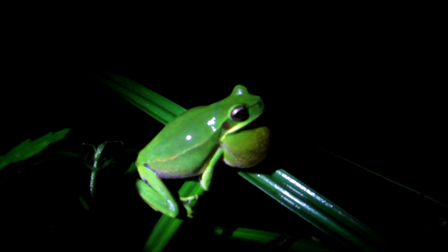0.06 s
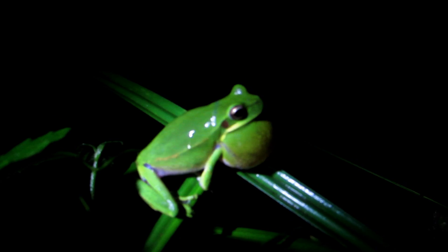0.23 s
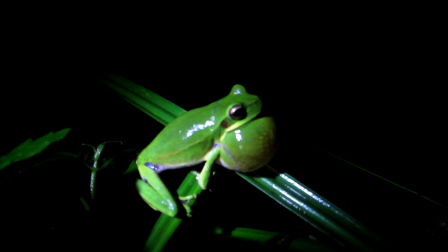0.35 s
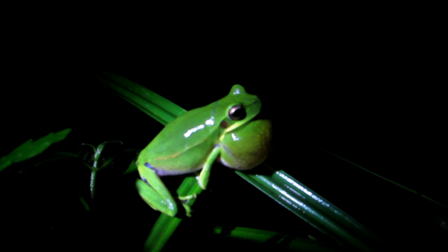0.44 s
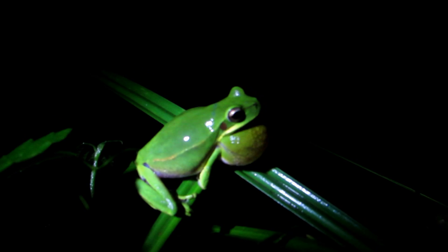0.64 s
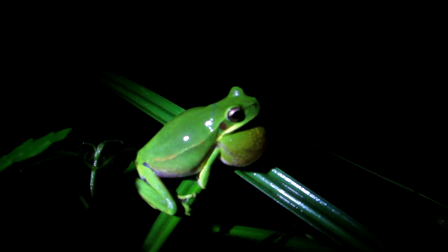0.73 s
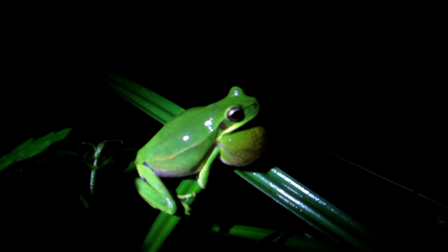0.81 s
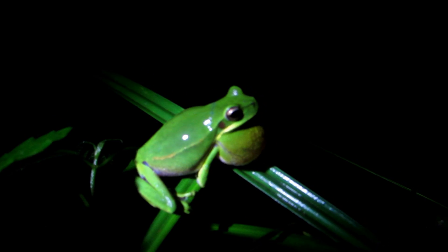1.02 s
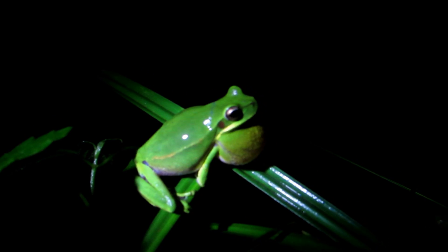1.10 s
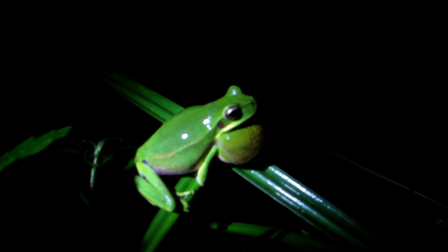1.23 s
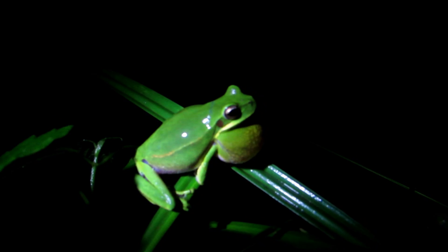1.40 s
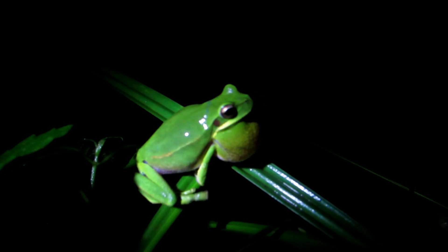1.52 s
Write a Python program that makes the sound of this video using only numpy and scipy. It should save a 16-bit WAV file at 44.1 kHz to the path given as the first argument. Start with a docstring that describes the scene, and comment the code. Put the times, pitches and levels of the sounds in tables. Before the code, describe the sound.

Close tree frog croaks, four short pulses then a buzzing longer croak, rougher frogs answering farther off

```python
"""Night by a pond. From the start a stereo hiss (shaped noise), crickets (wavering tones and narrow noise bands)
and distant frogs. Soon a tree frog close to the microphone gives four short croaks and a long one, each a train
of throat pulses ringing its vocal sac; a drawn gain curve sinks hiss and crickets meanwhile, then recovers.
More frogs answer farther off, wetter and rougher, each from its side; about a second in, one purrs slowly,
and near the end two ticks (short noise bursts) snap in the leaves."""
import sys
import numpy as np
from scipy import signal
from scipy.fft import rfft, irfft, next_fast_len
from scipy.io import wavfile
from scipy.ndimage import map_coordinates

SR = 44100
rng = np.random.default_rng(int(sys.argv[2]) if len(sys.argv) > 2 else 0)


def output_pcm(signal):
    """Save a mono or channel-first signal as 16-bit PCM at the path in sys.argv[1].

    Samples are clipped to [-1, 1] before scaling.
    """
    pcm = np.clip(np.atleast_2d(signal).T, -1, 1) * 32767
    wavfile.write(sys.argv[1], SR, np.round(pcm).astype(np.int16))


def amplitude_ratio(level_db):
    """Convert a level in decibels to the matching linear amplitude (field) ratio."""
    exponent = np.asarray(level_db, float) / 20
    return 10 ** exponent


N = 68355
T = np.arange(N) / SR  # seconds


def unit(x):
    """x scaled to an rms of 1."""
    return x / np.sqrt(np.mean(x ** 2) + 1e-20)


def along(points, hz):
    """Reads (Hz, value) points on a log frequency axis."""
    f, v = np.transpose(points)
    return np.interp(np.log(hz + 1), np.log(f + 1), v)


def filtered(x, response):
    """x times a response of frequency."""
    m = next_fast_len(N + 8192)
    return irfft(rfft(x, m) * response(np.fft.rfftfreq(m, 1 / SR)), m)[..., :N]


def wobble(rate):
    """A smooth random curve, rate knots a second."""
    return map_coordinates(rng.standard_normal(int(N * rate / SR) + 4), [T * rate])


def hiss():
    """Stereo night noise of rms 1; the angle between its mid and side shares sets how alike the two sides are."""
    # Tone of the night. Each row: frequency in Hz, relative density in dB per Hz.
    hiss_tone = [(15, -46), (25, -22.5), (177, -13.5), (258, -15), (406, -8.5), (503, -9.5), (908, -10),
                 (1360, -3.5), (2080, -7.5), (2380, -9.5), (2650, -11), (3970, -15), (5050, -11),
                 (7760, -19.5), (11300, -19), (15200, -21.5)]
    # Likeness of the two sides. Each row: frequency in Hz, left-right correlation from -1 to 1.
    likeness = [(60, 0.69), (180, -0.012), (540, 0.41), (1630, 0.62), (4890, 0.56), (14700, -0.3)]

    def shares(f):
        angle = np.arccos(np.clip(along(likeness, f), -1, 1)) / 2
        return amplitude_ratio(along(hiss_tone, f)) * [np.cos(angle), np.sin(angle)]

    mid, side = filtered(rng.standard_normal((2, N)), shares)
    return unit(np.array([mid + side, mid - side]))


def crickets():
    """A thin low song of gated, wavering tones, and two chirping narrow noise bands above."""
    # Low song. Each row: start in seconds, length in seconds, mean level in dB before panning, pitch in Hz.
    low_song = [(0.011, 0.14, -50.5, 2336), (0.989, 0.045, -44, 2305), (1.158, 0.108, -50, 2320)]
    # High singers. Each row: centre in Hz, half width in Hz, level in dB ahead of the bouts and chirps,
    # chirps per second, time of one chirp in seconds, chirp depth in dB either way.
    high_singers = [(5270, 14, -60.5, 35.7, 1.4996, 8), (4900, 180, -63.5, 36, 0, 2)]
    # Bouts of the highest singer. Each row: time in seconds, change of level in dB.
    bouts = [(.58, -4), (.66, 1), (.96, 0.5), (1.05, -14), (1.2, 0.5)]
    low = np.zeros(N)
    for s, length, db, hz in low_song:
        strength = amplitude_ratio(db + 2.6 * wobble(60.65))
        tone = np.sin(2 * np.pi * hz * T + .5 * wobble(38.5))
        gate = np.clip(np.minimum(T - s, s + length - T) / 0.0032, 0, 1)  # 3.2 ms ramps
        low += strength * tone * gate
    out = low * amplitude_ratio([[2.5], [-2.5]])  # to the left
    bout_curves = (np.interp(T, *np.transpose(bouts)), 0)
    for bout_db, (hz, width_hz, db, rate, s, depth_db) in zip(bout_curves, high_singers):
        noise = rng.standard_normal((2, N))
        singer, spread = unit(filtered(noise, lambda f: 1 / (1 + ((f - hz) / width_hz) ** 2)))
        singer = unit(singer / np.abs(signal.hilbert(singer)))  # wavering pitch, even strength
        chirp_db = depth_db * np.cos(2 * np.pi * rate * (T - s))
        strength = amplitude_ratio(db + bout_db + chirp_db + wobble(2.45))
        out = out + strength * np.array([singer + 0.19 * spread, singer - 0.49 * spread])
    return out


def ticks():
    """Short bright snaps in the leaves: bell-shaped bursts of flickering, treble-heavy noise."""
    # Leaf ticks. Each row: start in seconds, peak of the burst's envelope in dB ahead of trim_db.
    leaf_ticks = [(1.2403, -28), (1.49, -29)]
    length_s, trim_db = 0.011, -0.5
    half_s = length_s / 2
    shape = sum(amplitude_ratio(db + trim_db) * np.exp(-((T - s - half_s) / half_s) ** 2) for s, db in leaf_ticks)
    flicker = rng.standard_normal((2, N)) * amplitude_ratio(3.4 * wobble(630))
    return shape * filtered(flicker, lambda f: f / (f + 2500) / (1 + (f / 9000) ** 2))


def croak(s, length, db, fade_db, rates, modes, choke_s, jitter, scatter_db):
    """Throat pulses on a rate curve, each snapping and ringing the modes until the next one chokes it."""
    # modes: (Hz, dB, t60 s); jitter: a share of the first pulse period
    rise_s, release_s, release_db = .00045, 0.022, -4
    crack_db, crack_t60_s = -40, 0.012
    luck = rng.standard_normal((64, 2))
    # count the pulses along the rate curve, then find when each falls
    u = np.linspace(0, 1, 200)
    rate_curve = np.interp(u, np.linspace(0, 1, len(rates)), rates)
    beats = np.cumsum(rate_curve) * length / len(u)
    k = np.arange(int(np.round(beats[-1])) + 1)
    at = np.interp(k, beats - beats[0], u * length) + jitter * luck[k, 0] * (k > 0) / rates[0]
    size_db = db + fade_db * np.sqrt(np.abs(at) / length) + scatter_db * luck[k, 1]
    # longer croaks sink further at their end
    release = np.clip(1 - (length - at) / release_s, 0, 1) * (length > 2 * release_s)
    size_db = size_db + release_db * release
    i = int(s * SR)
    span = np.arange(i, min(N, i + int((length + 0.026) * SR)))
    t = np.clip(span / SR - s - at[:, None], 0, None)  # seconds since each pulse, one row a pulse

    def steps(v):
        """The value for each pulse, from values at even steps through the croak."""
        return np.interp(at / length, np.linspace(0, 1, np.size(v)), np.ravel(v))[:, None]

    ring = sum(amplitude_ratio(steps(g) - 60 * t / t60) * np.sin(2 * np.pi * steps(hz) * t) for hz, g, t60 in modes)
    ring = ring + amplitude_ratio(crack_db - 60 * t / crack_t60_s) * rng.standard_normal(N)[span]
    since_next = np.vstack([t[1:], 0 * t[0]])
    choke = np.exp(-(since_next / choke_s) ** 2)
    rise = 1 - np.exp(-(t / rise_s) ** 2)
    out = np.zeros(N)
    out[span] = amplitude_ratio(size_db) @ (ring * choke * rise)
    return out


def echoes(x):
    """The plants around send back a short blurred tail, a different one to each side of the microphone."""
    t60_s = .12
    t = T[:SR // 4]
    tail = rng.standard_normal((2, len(t))) * amplitude_ratio(-60 * t / t60_s) * (t > .003)
    return signal.fftconvolve(x[None], tail / np.linalg.norm(tail[0]), axes=1)[:, :N]


def radiated(x):
    """A steep loss of the lows, down 29 dB below 750 Hz so that a faint thump stays; the sign is turned."""
    return -signal.sosfilt(signal.cheby2(5, 29, 750, "high", fs=SR, output="sos"), x)


def purr(choke_s=0.0028, jitter=.018):
    """Slow, short, even pulses from a far frog, each ringing one mode."""
    # One row: start in seconds, length in seconds, first pulse in dB, ring in Hz,
    # pulses per second at the start and end, t60 in seconds.
    s, length, db, hz, rates, t60 = (.9875, .192, -33, 1400, (67, 61), .014)
    return croak(s, length, db, 0, rates, [(hz, 0, t60)], choke_s, jitter, scatter_db=2.5)


def far_frogs():
    """Rougher, wetter croaks from a distance, each louder and earlier on its own side."""
    # Croaks. Each row: length in seconds, first pulse in dB ahead of panning and filter, fade in dB,
    # pulses per second at mid-croak, sac in Hz, throat in Hz, throat in dB beside the sac, left minus right in dB.
    far_croaks = [(0.062, -36.5, -8, 790, 1883, 1040, -9, 2), (0.026, -26, 2, 150, 1390, 1230, -8, 0.5),
                  (0.099, -29, -17.5, 400, 1790, 1440, -2.5, -20.5),
                  (0.073, -32.5, -4, 370, 1710, 1440, 2, -3), (0.06, -19, -30, 260, 1755, 1110, -4.5, -2.5),
                  (0.032, -21.5, -7, 357, 1710, 1065, -9, -3), (0.078, -26.5, -24.5, 490, 1780, 1080, 0, 1),
                  (0.05, -29, -8, 385, 1926, 1154, -0.5, 3), (0.05, -31.5, 6, 345, 2050, 1520, 1.5, 1),
                  (0.061, -22, -1, 334, 1734, 1163, -5, -3.5), (0.017, -24, -8, 440, 2020, 1520, 2, -4.5),
                  (0.037, -23, -4.5, 410, 2094, 1280, -8, -2.5),
                  (0.065, -19, -2, 330, 1733, 1183, -8, -3.5),
                  (0.0179, -18.5, -4.5, 323, 2310, 1800, -2.5, -4),
                  (0.021, -13.5, -13, 260, 2240, 1550, -5, -0.5),
                  (0.07, -17, -12, 322, 1690, 1274, -6.5, -4.5),
                  (0.041, -16, -11.5, 420, 2297, 1836, -5, -3.5),
                  (0.045, -15, -15.5, 380, 1616, 1420, -5.5, -4.5),
                  (0.015, -28, -9.5, 295, 1230, 1520, 2, 6.5),
                  (0.025, -14.5, -6.5, 335, 1650, 1240, -4, -2.5),
                  (0.0132, -23, -1.5, 290, 1450, 1150, -6.5, 1),
                  (0.015, -21.5, -1.5, 336, 1760, 1300, -11, 0.5),
                  (0.0143, -15, -4, 220, 1680, 1410, -5, -3.5),
                  (0.045, -27, -2.5, 303, 1840, 1206, -2.5, -4),
                  (0.017, -22.5, -3, 296, 1630, 1263, 1, 1.3), (0.03, -27.5, -7, 295, 1175, 1700, -1, -0.5),
                  (0.095, -35.5, -4.5, 210, 1880, 1630, -2.5, -1)]
    # Each row: start of a croak in seconds.
    far_starts = [0, .1945, .283, .36, .455, .5283, .567, .638, .7, .7195, .774, .795, .809, .851, .876,
                  .8995, .937, 1.1975, 1.235, 1.267, 1.307, 1.322, 1.3478, 1.366, 1.3945, 1.41, 1.44]
    # The scratchy top of a pulse. Each row: frequency in Hz, t60 in seconds.
    rasp = [(2750, 0.011), (3450, 0.0072)]
    # Each row: level of one croak's rasp in dB beside the sac.
    rasp_levels = [-24, -13.5, -22, -31, -14, -35, -13, -1.5, -34, -12, -15.5, -34, -17, -17, -30, -12, -12,
                   -18.5, -11, -17.5, -13, -25, -18.5, -26, -8, -10, -23]
    t60_s, choke_s, wet_db, lag_s_per_db = 0.039, 0.0028, -8, 1.3e-5
    arch = np.array([1 - 0.0428, 1, 1 - 0.0428])  # the pulse rate is lower at both ends
    out = np.zeros((2, N))
    for s, rasp_db, row in zip(far_starts, rasp_levels, far_croaks):
        length, db, fade, rate, hz, low_hz, low_db, pan_db = row
        modes = [(hz, 0, t60_s), (low_hz, low_db, t60_s)] + [(f, rasp_db, t60) for f, t60 in rasp]
        x = croak(s, length, db, fade, rate * arch, modes, choke_s, jitter=.018, scatter_db=2.4)
        side = np.array([[.5], [-.5]]) * pan_db
        pair = np.array([np.interp(T + lag, T, x) for lag in side[:, 0] * lag_s_per_db])
        out += amplitude_ratio(side) * pair
    return radiated(out + amplitude_ratio(wet_db) * echoes(out.mean(0)))


def near_frog():
    """Clean, steady pulses ring throat against sac, close by and reaching the right side a little first."""
    # Croaks. Each row: start in seconds, length in seconds, first pulse in dB ahead of the filters, fade in dB,
    # sac t60 in seconds, top ring in Hz, sac in Hz and pulses per second at even steps through the croak.
    near_croaks = [(0.2140, 0.004, 0.52, -1, 0.017, 5960, (1650,), (232, 232)),
                   (0.2501, 0.0094, 2.4, -7, 0.017, 7200, (1650,), (210.4, 204)),
                   (0.2931, 0.0079, 0.57, -1.5, 0.013, 6560, (1624,), (225, 231.7)),
                   (0.338, 0.0140, 0.025, -1.5, 0.015, 7460, (1720, 1654), (259.7, 255, 152.5)),
                   (0.3947, 0.053, 0.078, -10.5, 0.017, 6960, (1710, 1830, 1590),
                   (305.8, 333.3, 350.8, 340.4, 316, 247))]
    # Rings above the sac. Each row: frequency in Hz, level in dB beside the sac, t60 in seconds.
    body = [(2320, -24.5, 0.006), (3100, -22, 0.0068), (4720, -29.5, 0.0056)]
    # The throat's ring. One row: frequency in Hz, level in dB beside the sac, t60 in seconds.
    throat = (1070, -11.5, 0.035)
    # Each row: level of the thin top ring in dB beside the sac, at even steps through the croak.
    top_levels = (-38, -29, -36)
    top_t60_s, sac_choke_s, throat_choke_s = .007, 0.00023, 0.0025  # the throat is stilled more slowly
    jitter, scatter_db = .003, .8
    thump_db, thump_s, lag_s, wet_db = -41, 0.00022, 2.6e-5, -32
    x = np.zeros(N)
    for s, length, db, fade, t60, top_hz, hz, rates in near_croaks:
        sac_modes = [(hz, 0, t60)] + body + [(top_hz, top_levels, top_t60_s)]
        x += croak(s, length, db, fade, rates, [throat], throat_choke_s, jitter, scatter_db)
        x -= croak(s, length, db, fade, rates, sac_modes, sac_choke_s, jitter, scatter_db)
    # the sac radiates no lows, and little just under the throat ring
    x = signal.sosfilt(signal.butter(3, 590, "high", fs=SR, output="sos"), x)
    x = signal.lfilter(*signal.iirnotch(814, 4.33, SR), x)
    # a small push of air as a croak opens, under its first pulse
    for s, _, db, *_ in near_croaks:
        u = np.clip(T - s, 0, None) / thump_s
        x = x - amplitude_ratio(db + thump_db) * u * np.exp(1 - u)
    pair = filtered(x, lambda f: np.exp(1j * np.pi * f * lag_s * np.array([[-1], [1]])))
    return pair + amplitude_ratio(wet_db) * echoes(x)


def scene():
    """Sums frogs and ticks with hiss and crickets, these two under the recorder's gain as a drawn curve."""
    # Recorder's automatic gain, as a drawn curve on hiss and crickets: sinks as the near frog calls,
    # then recovers. Each row: time in seconds, hiss level in dB ahead of hiss_db.
    gain_curve = [(0.0, -54), (0.266, -52), (0.396, -58.5), (0.682, -53.5), (0.948, -50.5), (1.39, -48),
                  (1.55, -47)]
    hiss_db = 7
    gain_db = np.interp(T, *np.transpose(gain_curve))
    cricket_gain = amplitude_ratio(gain_db - gain_db.mean())
    frogs = near_frog() + far_frogs() + purr()
    return frogs + ticks() + cricket_gain * crickets() + amplitude_ratio(gain_db + hiss_db) * hiss()


def top_cut(x):
    """Nothing passes above the cut-off."""
    return signal.sosfilt(signal.butter(12, 15310, fs=SR, output="sos"), x)


def record(dry):
    """The microphone loses the top octave's end and dips at some pitches; peaks clip at full scale."""
    # Microphone dips. Each row: centre in Hz, half width in Hz, depth from 0 to 1.
    mic_dips = [(3990, 196, 0.62), (8500, 49, 0.32)]
    top_hz = 13900

    def microphone(f):
        dips = [1 - np.clip(d, 0, 1) / (1 + ((f - c) / w) ** 2) for c, w, d in mic_dips]
        return 1 / (1 + (f / top_hz) ** 40) * np.prod(dips, axis=0)

    mix = np.clip(filtered(dry, microphone), -1, 1)
    return top_cut(mix)


dry = scene()
out = record(dry)
output_pcm(out)
```